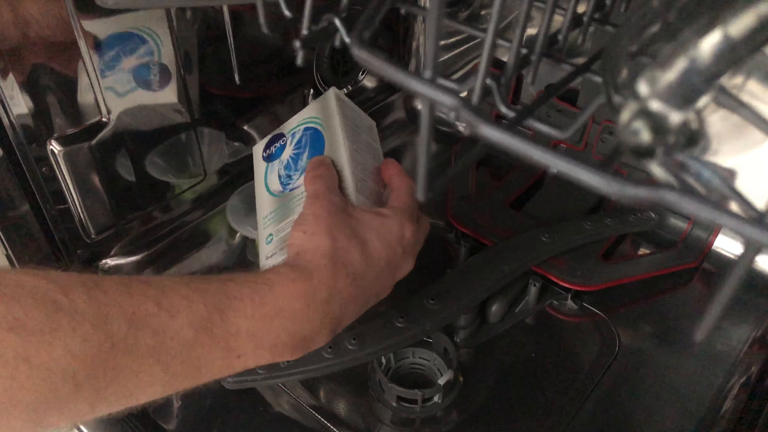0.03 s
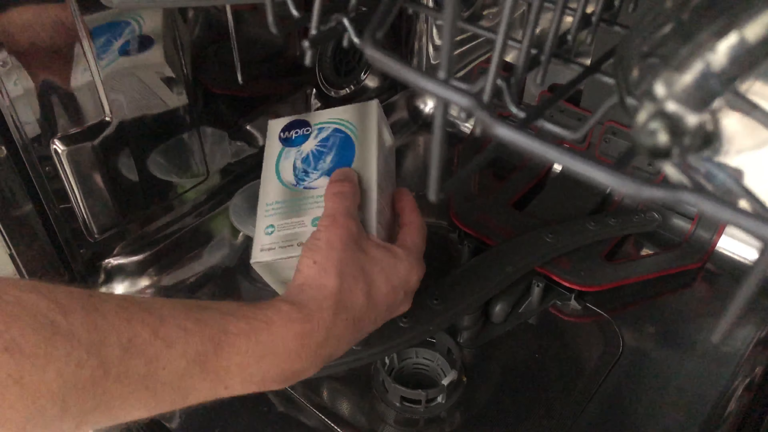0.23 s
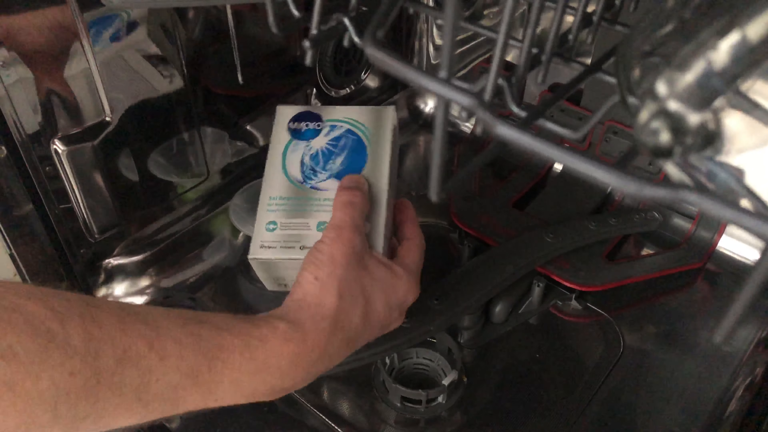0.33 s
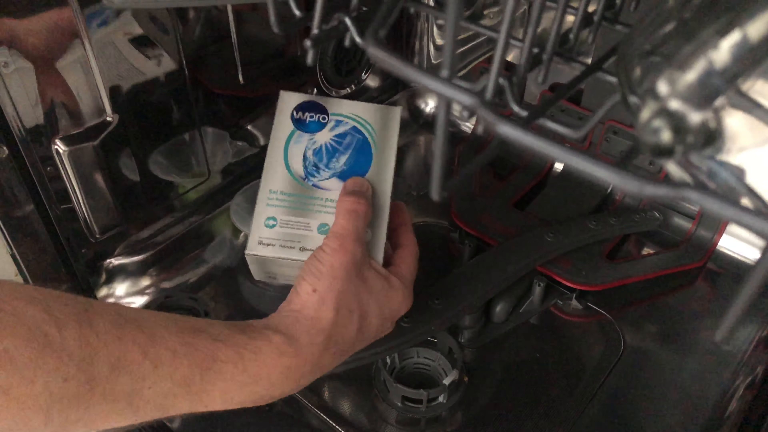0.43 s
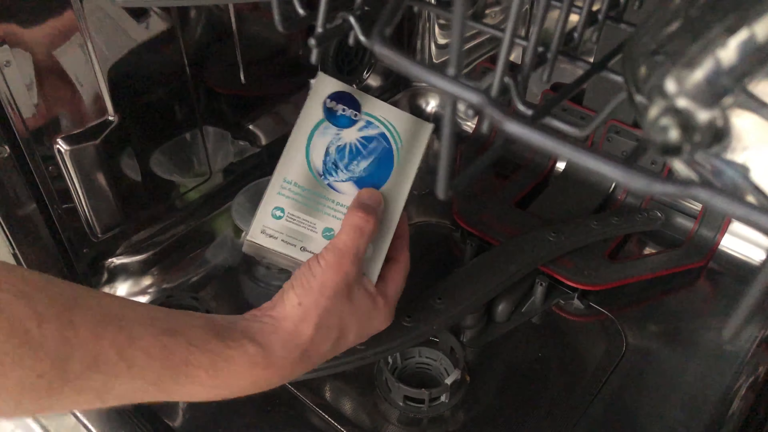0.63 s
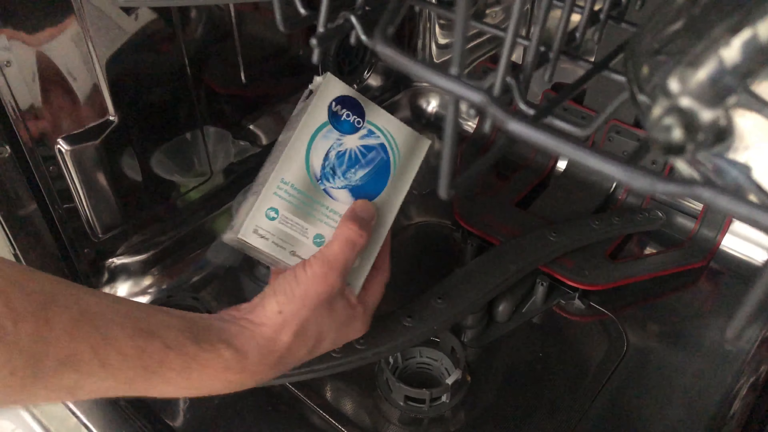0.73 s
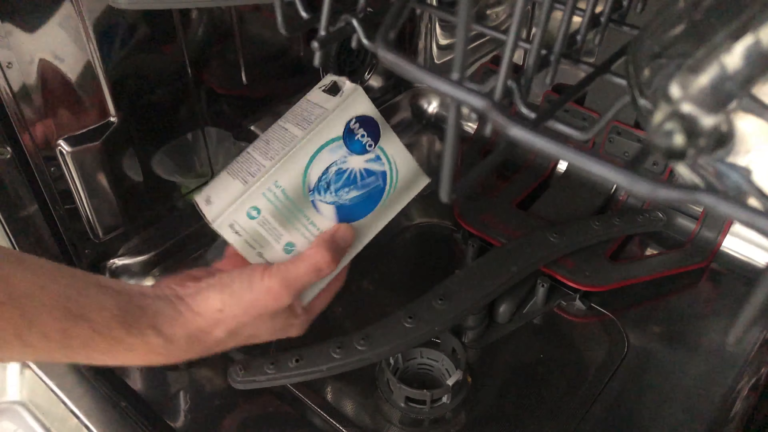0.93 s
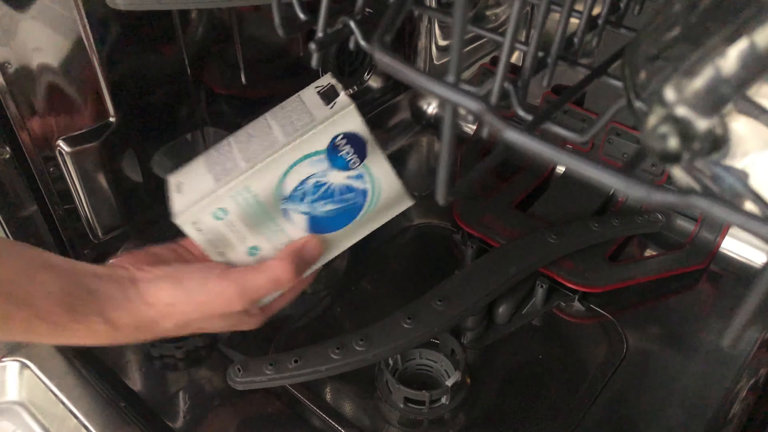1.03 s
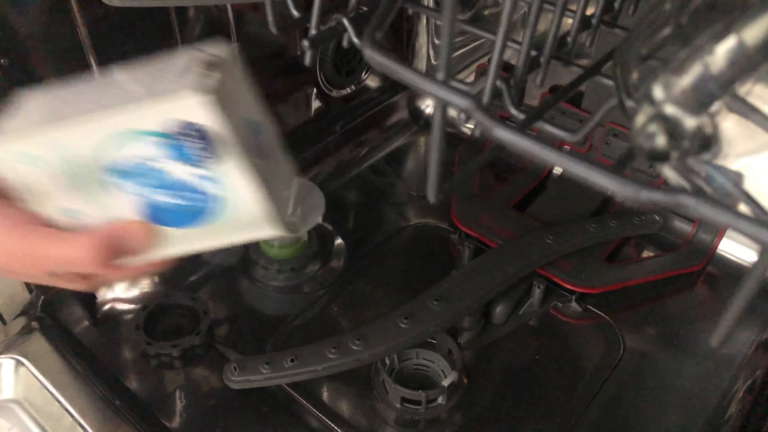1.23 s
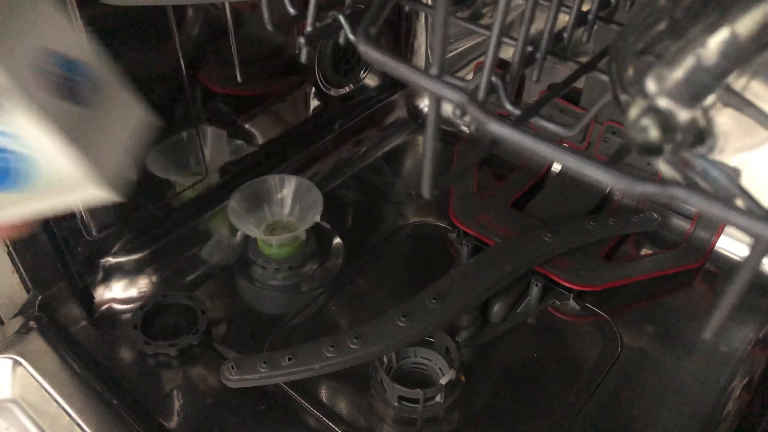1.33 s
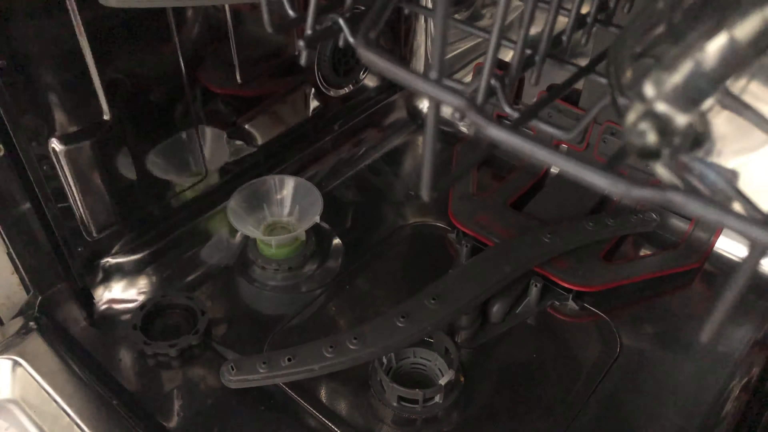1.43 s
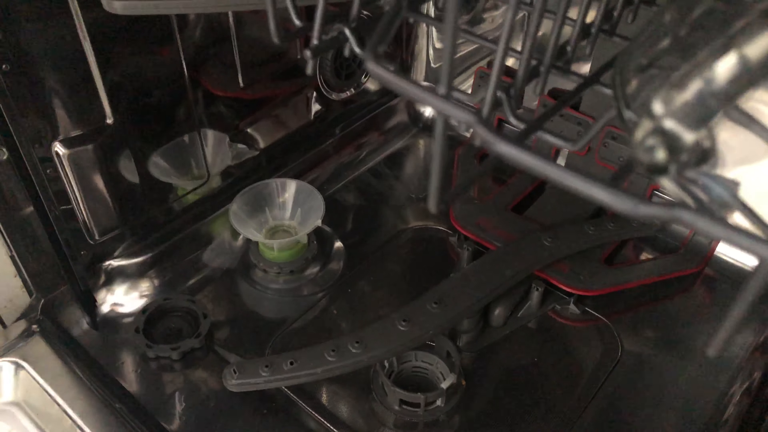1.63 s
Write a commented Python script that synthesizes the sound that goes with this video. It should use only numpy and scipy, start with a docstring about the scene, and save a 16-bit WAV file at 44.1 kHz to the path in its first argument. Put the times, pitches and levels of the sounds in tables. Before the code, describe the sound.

Salt grains shift in surges inside a handled cardboard box that crackles lightly.

```python
"""Sharp crackles come first, as fingers crease a cardboard box of coarse salt in an open dishwasher.
The box is tipped back and lifted out: grains slide along its walls in surges and small lumps tumble,
their many impacts exciting the resonances of box and tub. A flexing wall gives one soft thump,
then a far fainter one. The steel tub adds a short bright ring over a faint room hum."""
import sys
import numpy as np
from scipy import signal
from scipy.fft import rfft, irfft
from scipy.io import wavfile

SR = 44100
rng = np.random.default_rng(int(sys.argv[2]) if len(sys.argv) > 2 else 0)


def output_pcm(signal):
    """Save a mono or channel-first signal as 16-bit PCM at the path in sys.argv[1].

    Samples are clipped to [-1, 1] before scaling.
    """
    pcm = np.clip(np.atleast_2d(signal).T, -1, 1) * 32767
    wavfile.write(sys.argv[1], SR, np.round(pcm).astype(np.int16))


N = 74970

# how hard the salt slides (time [s], relative level [dB])
SLIDE_LEVEL = [(0, -73.5), (.09, -54.5), (.14, -55), (.18, -55.5), (.24, -49.5), (.32, -50), (.375, -54.5),
               (.402, -38.5), (.44, -42), (.465, -35.5), (.5, -39.5), (.52, -42), (.565, -30.5),
               (.625, -29), (.65, -30), (.72, -24), (.79, -34.5), (.825, -30), (.885, -24), (.92, -27),
               (.955, -28), (1.02, -35), (1.055, -34.5), (1.085, -38), (1.18, -35.5), (1.215, -36),
               (1.24, -32), (1.305, -36.5), (1.35, -44.5), (1.385, -39.5), (1.435, -38), (1.48, -53.5),
               (1.515, -55), (1.54, -44.5), (1.572, -41.5), (1.605, -52), (1.635, -39), (1.7, -61.5)]
# gain of the salt's low band (time [s], gain [dB])
BODY_GAIN = [(0, 2), (.34, -7), (.41, 1.5), (.465, -2.5), (.58, -2), (.72, -3.5), (.82, -5.5), (.89, -0.5),
             (.94, -5.5), (1.07, 2.5), (1.12, 0.5), (1.18, 5), (1.27, -10), (1.43, 6.5), (1.57, 4.5),
             (1.7, 3)]
# gain of the salt's treble (time [s], gain [dB])
TREBLE_GAIN = [(0, -7.5), (.45, -2), (.62, 0.5), (.75, -1.5), (.89, -3.5), (.95, -2), (1.1, -2),
               (1.3, -4.5), (1.42, -1.5), (1.57, -2.5), (1.7, 3.5)]
# lumps striking a wall (time [s], relative level [dB], time scale [s], centre frequency [Hz])
LUMP_HITS = [(.718, -14, .005, 3160), (0.889, -2, 0.016, 605), (1.042, -9.5, 0.0056, 2640),
             (1.096, -12.5, 0.0047, 2310), (1.138, -11.5, 0.0018, 1940), (1.165, -14, .005, 1500),
             (1.191, -7.5, 0.0043, 1340), (1.25, -13, 0.0045, 2170), (1.634, -21.5, 0.0018, 4060),
             (1.654, -22, 0.0023, 3500)]
# resonances of box and tub (frequency [Hz], bandwidth [Hz], gain [dB])
BOX_MODES = [(345, 22, -3), (458, 18, 3), (555, 22, -1), (775, 14, 5), (1170, 14, -1), (1215, 20, 0),
             (1442, 24, -1), (2111, 28, -1), (2474, 28, -2), (2910, 14, 0), (3306, 18, -1), (3490, 27, -2),
             (3657, 18, -3), (4040, 22, -5)]
# grains heard through the cardboard (frequency [Hz], relative spectral level [dB])
SALT_SPECTRUM = [(60, -41), (125, -12), (190, -22), (320, -12), (470, -8), (690, -9), (900, -7.5),
                 (1400, -6.5), (2040, -2.5), (3400, -2), (6000, -3.5), (9400, -9.5), (14400, -20.5),
                 (16000, -30)]
# snapping creases (time [s], relative level [dB], time scale [s], ring frequency [Hz])
CREASE_SNAPS = [(.2482, -3.5, .002, 6400), (.2512, -4, .002, 6400), (.2700, -11, .002, 6700),
                (.2731, -1, .0028, 7100), (.2798, .5, .0025, 6900), (.3091, -16.5, .0025, 6000),
                (.3434, -7.5, .0018, 5950), (.3904, -11, .0015, 7000), (.5192, -6.5, .0022, 5800),
                (.5729, -.5, .0014, 7300), (.5763, -3, .0018, 7400)]
# colour of a snap (frequency [Hz], relative spectral level [dB])
SNAP_SPECTRUM = [(200, -35), (850, -32), (1400, -13.5), (2300, -19.5), (4900, -6.5), (5600, 0.5), (7200, 2),
                 (8500, -2.5), (9300, 4), (10000, -2), (11000, 1), (11600, -4), (12500, -2.5),
                 (16000, -12.5)]
# dull knocks of a flexing wall (time [s], level [dB])
WALL_KNOCKS = [(1.398, -36.5), (1.63, -53.5)]
# ring of the steel tub (frequency [Hz], time to decay by 60 dB [s])
TUB_DECAY = [(200, 0.24), (1000, 0.22), (3000, 0.14), (7000, 0.16), (15000, 0.081)]
# room tone (frequency [Hz], relative spectral level [dB])
ROOM_SPECTRUM = [(20, -22), (35, -13), (50, 6), (70, -14), (100, 2), (160, -6.5), (280, -0.5), (450, -6.5),
                 (750, -16), (3000, -19), (15000, -27)]


def sliding_salt(walls=5, slide_db=0.5):
    """Source and filter: impacts on several walls excite resonances, and the cardboard colours them."""
    sliding = sum(tub_reverb(curve(SLIDE_LEVEL) * grains()) for _ in range(walls)) / np.sqrt(walls)
    hits = amp(slide_db) * sliding + lumps()
    ringing = sum(amp(db) * resonate(hits, hz, width) for hz, width, db in BOX_MODES)
    return shift_balance(colour(hits + ringing, SALT_SPECTRUM))


def grains(fine_per_s=2200, coarse_per_s=45, clump_s=0.0044, clump_db=2.5, coarse_db=-8):
    """Shot noise: fine grains strike one wall in clumps, with a few coarse ones among them."""
    window = np.hanning(round(2 * clump_s * SR))
    clumps = unit_rms(signal.fftconvolve(rng.standard_normal(N), window, "same"))
    fine = unit_rms(impacts(fine_per_s, spread_db=4) * amp(clump_db * clumps))
    coarse = signal.fftconvolve(impacts(coarse_per_s, spread_db=5.5), slips(scale_s=0.00053))[:N]
    return fine + amp(coarse_db) * coarse


def impacts(per_s, spread_db):
    """A Poisson process: independent clicks of uneven size, at rms 1."""
    size = amp(spread_db * np.minimum(rng.exponential(1, N), 4))
    return unit_rms(size * rng.choice([-1, 1], N) * (rng.random(N) < per_s / SR))


def lumps(gain_db=-1, ring_db=20, width_share=0.42):
    """Impact excitation: each lump of salt tumbling against the wall drives one broad resonance."""
    out = np.zeros(N)
    for start, db, scale_s, hz in LUMP_HITS:
        fall = slips(scale_s, size=2048)
        ring = amp(ring_db) * resonate(fall, hz, hz * width_share)
        add(out, start, amp(db + gain_db) * tub_reverb(unit_energy(fall + ring)))
    return out


def shift_balance(x, body_hz=1040, treble_hz=5100):
    """Complementary bands: the salt's body and treble swell and fade about an unchanged middle."""
    hz, spectrum = np.fft.rfftfreq(2 * N, 1 / SR), rfft(x, 2 * N)
    low = 1 / (1 + (hz / body_hz) ** 4)
    high = 1 - 1 / (1 + (hz / treble_hz) ** 4)
    body, middle, treble = (irfft(spectrum * share)[:N] for share in (low, 1 - low - high, high))
    return body * curve(BODY_GAIN) + middle + treble * curve(TREBLE_GAIN)


def carton_crackles(gain_db=3.5, ring_db=-4, ring_width_hz=1100):
    """Sudden release of strain: each crease snaps with a brief high ring and its own reflections."""
    out = np.zeros(N)
    for start, db, scale_s, hz in CREASE_SNAPS:
        snap = slips(scale_s)
        ring = amp(ring_db) * resonate(snap, hz, ring_width_hz)
        add(out, start, amp(db) * tub_reverb(unit_energy(snap + ring)))
    return amp(gain_db) * colour(out, SNAP_SPECTRUM)


def slips(scale_s, size=1024):
    """A noise transient: a quick run of tiny slips swells and dies away, with energy 1."""
    age = np.arange(size) / SR / scale_s
    return unit_energy(rng.standard_normal(size) * np.sqrt(age) * np.exp(-2 * age))


def wall_thumps(start_hz=250, end_hz=61.7, sag_s=0.016, length_s=0.024, rise_s=0.00049):
    """Damped vibration: a wall flexes with a puff of noise, falls in pitch and is stilled by the salt."""
    puff_hz, puff_width_hz, puff_db, puff_t60 = 370, 200, -1.5, 0.074
    out, t = np.zeros(N), np.arange(SR // 4) / SR
    hz = end_hz + (start_hz - end_hz) * np.exp(-t / sag_s)
    flex = -np.sin(2 * np.pi * np.cumsum(hz) / SR) / np.sqrt(1 + (t / length_s) ** 10)
    attack = np.minimum(t / rise_s, 1)
    for start, db in WALL_KNOCKS:
        band = resonate(rng.standard_normal(len(t)), puff_hz, puff_width_hz)
        puff = unit_rms(resonate(band, puff_hz, puff_width_hz)) * amp(puff_db - 60 * t / puff_t60)
        add(out, start, amp(db) * attack * (flex + puff))
    return out


def tub_reverb(x, near_t60=0.03, near_db=-1, ring_db=-6):
    """Reverberation: direct sound is followed by dense close reflections and the steel tub's ring."""
    t = np.arange(SR // 3) / SR
    near = unit_energy(rng.standard_normal(len(t)) * amp(-60 * t / near_t60) * (t > .001))
    hz, frame_s, noise = signal.stft(rng.standard_normal(len(t)), SR, nperseg=256)
    decay = amp(-60 * frame_s / at_frequency(TUB_DECAY, hz)[:, None])
    tail = signal.istft(noise * decay, SR, nperseg=256)[1][:len(t)]
    response = (t == 0) + amp(near_db) * near + amp(ring_db) * unit_energy(tail * (t > .003))
    return signal.fftconvolve(x, unit_energy(response))[:N]


def room_tone(noise_db=-61, hum_db=-71, hum_hz=97):
    """Stationary background: faint coloured noise and a low pure tone."""
    noise = colour(rng.standard_normal(2 * N), ROOM_SPECTRUM)[N:]
    hum = np.sqrt(2) * np.sin(2 * np.pi * hum_hz * np.arange(N) / SR)
    return amp(noise_db) * noise + amp(hum_db) * hum


def resonate(x, hz, width_hz):
    """A damped oscillator with a gain of about 1 at resonance."""
    radius = np.exp(-np.pi * width_hz / SR)
    pole = radius * np.exp(2j * np.pi * hz / SR)
    return 2 * signal.lfilter([1 - radius], [1, -pole], x).real


def colour(x, spectrum, size=4096):
    """Minimum-phase filtering: a causal response of unit energy imposes the spectrum."""
    log_gain = np.log(amp(at_frequency(spectrum, abs(np.fft.fftfreq(size, 1 / SR)))))
    taps = np.fft.ifft(np.exp(np.conj(signal.hilbert(log_gain)))).real[:size // 2]
    return signal.fftconvolve(x, unit_energy(taps))[:len(x)]


def at_frequency(table, hz):
    """Interpolation on a log-frequency axis."""
    table_hz, value = np.transpose(table)
    return np.interp(np.log(hz + 1), np.log(table_hz + 1), value)


def curve(points):
    """An envelope: gain per sample from (time [s], level [dB]) points."""
    return amp(np.interp(np.arange(N) / SR, *np.transpose(points)))


def add(mix, start_s, sound):
    """Superposition of a sound on the mix at a given time."""
    part = mix[round(start_s * SR):][:len(sound)]
    part += sound[:len(part)]


def amp(db):
    """Amplitude ratio of a level in decibels."""
    return 10 ** (np.asarray(db) / 20)


def unit_rms(x):
    """Normalisation to rms 1."""
    return x / np.sqrt(np.mean(x ** 2) + 1e-20)


def unit_energy(x):
    """Normalisation to energy 1."""
    return x / (np.linalg.norm(x) + 1e-20)


def scene():
    """Superposition: the pressures of salt, carton and room add in one channel."""
    return (sliding_salt() + carton_crackles() + wall_thumps() + room_tone())[None]


def record(dry):
    """Band limiting: filters pass the sound between a low cut and a steep treble edge."""
    low_cut_hz, edge_hz = 41, 15950
    dry = signal.sosfilt(signal.butter(3, low_cut_hz, "high", fs=SR, output="sos"), dry)
    return signal.oaconvolve(dry, signal.firwin(511, edge_hz, window=("kaiser", 9), fs=SR)[None], "same")


dry = scene()
out = record(dry)
output_pcm(out)
```